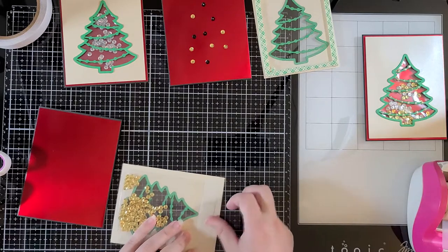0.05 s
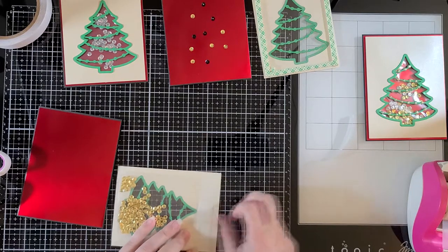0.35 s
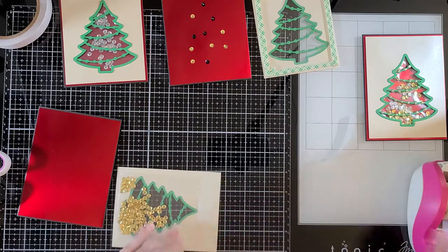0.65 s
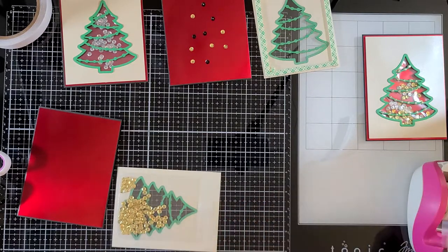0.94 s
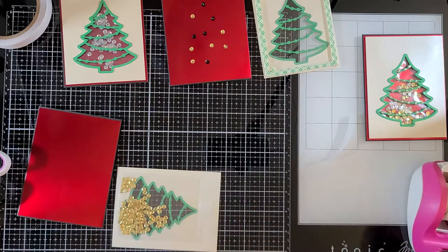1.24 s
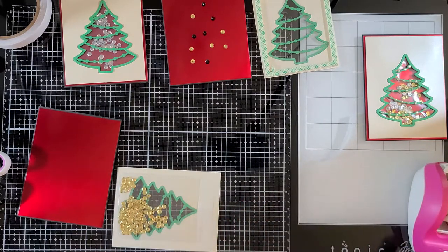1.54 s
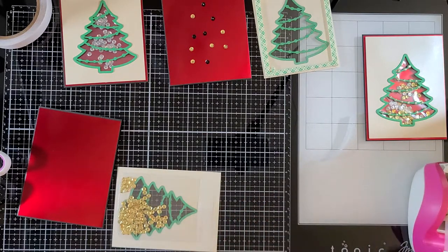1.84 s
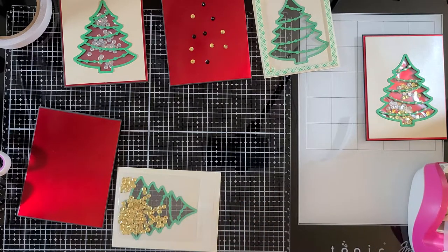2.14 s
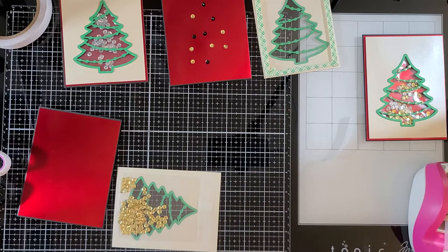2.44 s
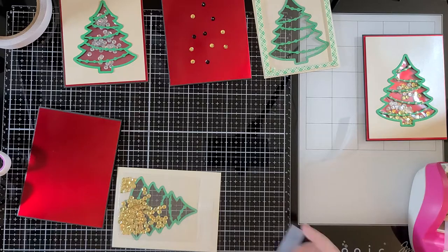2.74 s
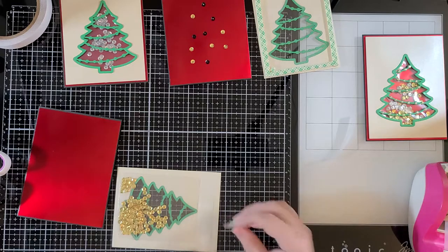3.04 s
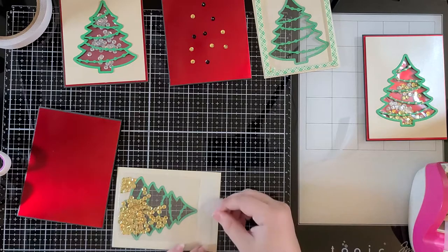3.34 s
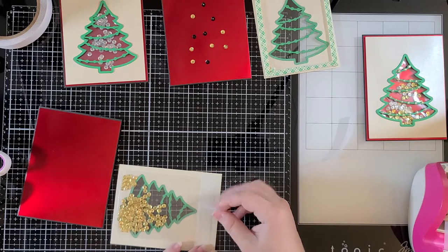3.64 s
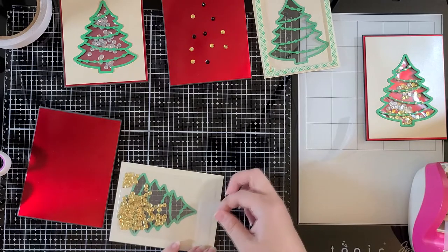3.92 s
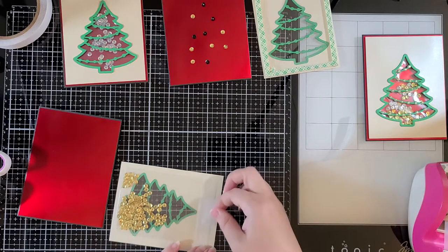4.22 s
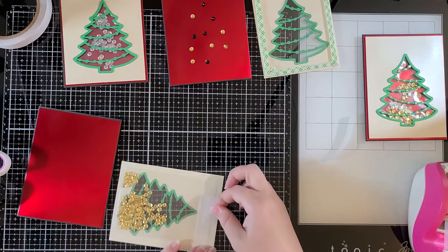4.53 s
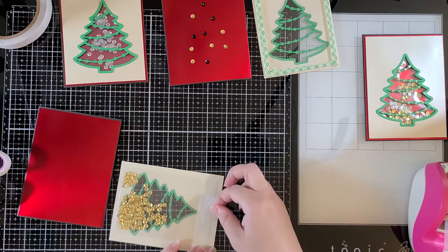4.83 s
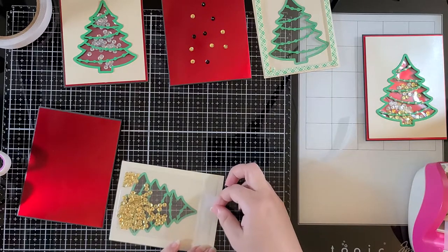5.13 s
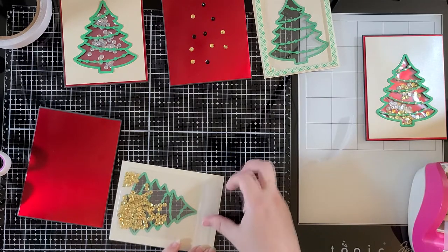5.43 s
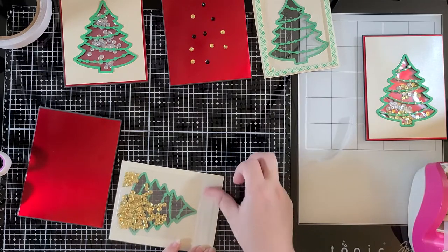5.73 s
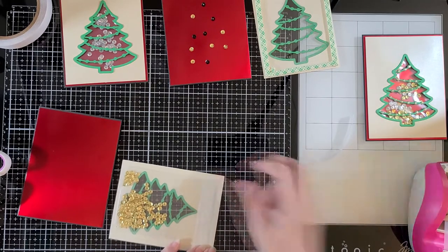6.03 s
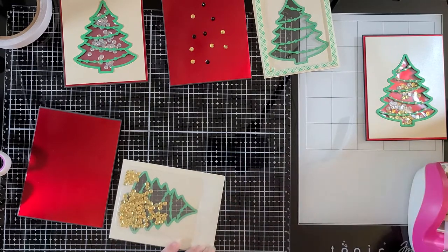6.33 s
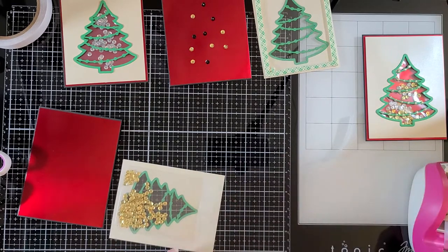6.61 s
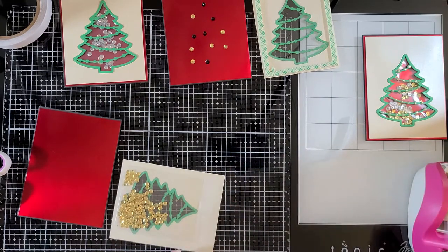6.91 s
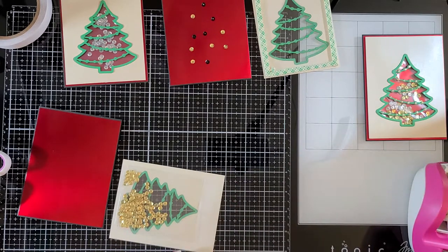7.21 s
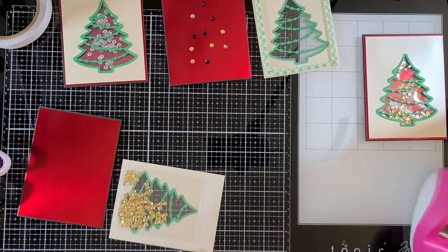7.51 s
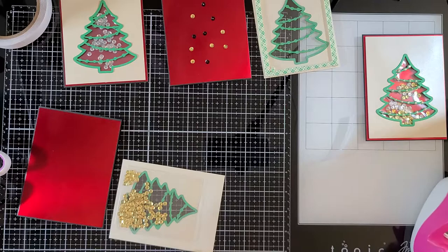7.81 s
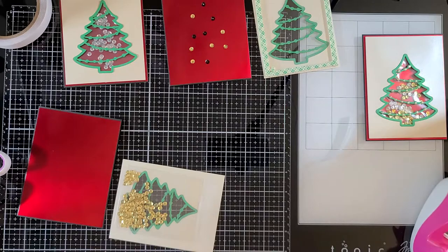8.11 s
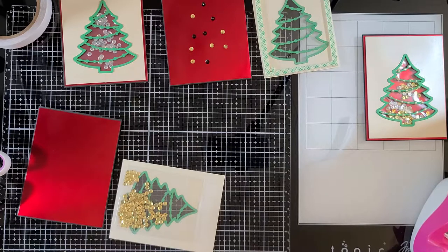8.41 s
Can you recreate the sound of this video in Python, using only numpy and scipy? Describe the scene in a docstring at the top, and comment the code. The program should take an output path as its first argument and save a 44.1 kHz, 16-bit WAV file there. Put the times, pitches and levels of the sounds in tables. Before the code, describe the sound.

A low, steady rumble fills a small, quiet room, and the handling sounds close. Fingers brush a paper card lightly, with a sharp tick and a plastic clack around 1 second. From 1.1 to 2.2 seconds clear tape crackles softly off a desk dispenser, whose hollow body knocks while the desk bumps dully. At 2.3 seconds the tape tears in one short rip with a thump. The strip ticks and crinkles until about 3.7 seconds, followed by a lull. From 5.2 to 6 seconds fingers rub the tape onto the card, with a crisp snap, small slides along the edge and soft pats. A sharp plastic clack and snap come near 6.9 seconds. Light knocks, a paper rub, two soft desk bumps and more clicks follow between 7.3 and 7.9 seconds. Around 8.3 seconds a plastic tool clatters in a quick, bright burst.

```python
"""Fingers brush and pat a paper card over the low rumble of a small, quiet room. Clear tape crackles off
a desk dispenser as its glue lets go, rips across the teeth and is rubbed down onto the card.
Tape and card tick and crinkle as they bend, the hollow dispenser knocks, and the desk booms softly
under each bump on the cutting mat. A plastic tool clatters at the end."""
import sys
import numpy as np
from scipy import signal
from scipy.fft import rfft, irfft, next_fast_len
from scipy.io import wavfile

SR = 44100
rng = np.random.default_rng(int(sys.argv[2]) if len(sys.argv) > 2 else 0)


def generate_wav(sig):
    """Save sig (samples, or channels by samples) to the path in sys.argv[1] as 16-bit PCM at SR."""
    pcm = np.round(np.clip(np.atleast_2d(sig).T, -1, 1) * 32767).astype(np.int16)
    wavfile.write(sys.argv[1], SR, pcm)


N = 373086
TIME = np.arange(N) / SR

# room tone: (frequency [Hz], level [dB])
RUMBLE_SPECTRUM = [(20, -13), (48, -4), (80, -7), (125, 1), (165, -1), (200, -15), (320, -22), (500, -27),
                   (900, -32), (2000, -35), (4000, -43), (7000, -50), (10500, -43), (15500, -53)]
# how alike the room tone is left and right: (frequency [Hz], correlation [-1..1])
RUMBLE_CORRELATION = [(30, .93), (130, .98), (300, .8), (700, .45), (1500, .05), (16000, 0)]
# fingers and tape sliding on paper: (start [s], length [s], treble [dB], presence re treble [dB])
PAPER_RUBS = [(0.15, .1, -62, -19), (0.325, .085, -58, -10), (0.595, .07, -63, 4), (0.845, .05, -68, 7),
              (0.878, .065, -53, 0), (0.93, .12, -63, -3), (1.335, .08, -57, 0), (2.37, .07, -56, -1),
              (2.51, .06, -64, -12), (2.58, .15, -69, -14), (2.835, .04, -65, -2), (3.24, .06, -68, -11),
              (3.37, .11, -66, -12), (3.54, .06, -66, -13), (5.16, .1, -66, -12), (5.22, .12, -61, -17),
              (5.32, .095, -56.5, -1.5), (5.52, .48, -70, -14), (6.63, .048, -56.5, 5), (7.35, .3, -63, -6),
              (7.66, .18, -71, -7), (7.825, .06, -60, -1)]
# scratch of rubbed paper: (frequency [Hz], width [Hz], level [dB])
PAPER_MODES = [(3250, 600, 5), (4350, 800, 9), (5500, 600, 5), (6500, 500, 0)]
# stiff plastic, lower and upper resonances: (frequency [Hz], width [Hz], level [dB])
PLASTIC_LOW_MODES = [(1150, 120, 2), (1480, 110, 5), (1870, 150, 8)]
PLASTIC_HIGH_MODES = [(3200, 350, -2), (3950, 350, 0), (4500, 500, 0)]
# where the hands work: (time [s], left over right [dB], reverb send [dB])
HAND_PATH = [(0.4, 0, -2), (0.9, -4.5, 0), (2.4, -3.5, 0), (2.7, -2, -4), (3.45, 1, -2), (3.7, 1, -1),
             (5.3, -2.5, -5), (6.7, -6.5, -2), (6.95, -3.5, 0), (8.35, -4, 0)]
# fingertips and card landing on the mat: (time [s], level [dB], tilt [dB/octave])
FINGER_TAPS = [(0.157, -51, -6), (0.343, -56, -2), (5.533, -51, -1), (5.816, -37.5, -4), (5.935, -40, -1)]
# the card on the mat: (frequency [Hz], width [Hz], level [dB])
CARD_MODES = [(470, 200, -8), (790, 100, 0), (960, 70, 0), (1080, 80, 0), (1540, 90, -8), (1770, 100, -9),
              (2000, 100, -7), (2410, 120, -15), (2820, 220, -9), (3820, 300, -20)]
# soft bumps on the mat: (time [s], level [dB], contact [s])
MAT_BUMPS = [(1.305, -29.5, .006), (1.4965, -22, .0052), (2.2945, -21.5, .005), (7.579, -25.5, .007),
             (7.630, -28.5, .007)]
# boom of the desk: (frequency [Hz], level [dB], t60 [s])
DESK_MODES = [(58, -18, .3), (104, -8, .13), (119, 1.7, .112), (152, -4, .1), (186, -2.5, .075),
              (240, -8, .055), (295, -11, .05), (350, -12, .04), (440, -12, .04)]
# thumb along the card's edge: (start [s], end [s], level [dB], tilt [dB/octave], pitch [ratio])
THUMB_SLIDES = [(0.21, 0.28, -64, -5, 1), (5.52, 5.575, -57, 1, 1), (5.56, 5.65, -64, -1, 1),
                (5.635, 5.715, -57.5, -1, 1.02), (5.69, 5.77, -62, 3, 1.22), (5.83, 5.875, -62, 3, 1.15),
                (5.945, 5.98, -62, 2, 1.3)]
# the card's edge under the thumb: (frequency [Hz], width [Hz], level [dB])
EDGE_MODES = [(840, 60, 3), (1540, 70, -1), (1990, 70, -2), (2260, 90, -12), (2950, 120, -13),
              (3310, 140, -14), (3810, 160, -16)]
# tape and card snapping as they bend: (time [s], treble [dB], mids re treble [dB],
# presence re treble [dB], decay [ms], pitch [Hz], ring [Hz], ring re treble [dB])
BEND_SNAPS = [(0.6105, -52, -8, 3, 1.5, 3270, 3030, -8), (0.9172, -46, -12, -3, 1, 4310, 3130, -14),
              (0.9648, -32.5, -7, -5, .7, 15000, 1500, -19), (0.9778, -45, -12, -8, 1.5, 15000, 3200, -16),
              (1.3458, -42, -19, -13, 1.5, 10000, 3500, -20), (1.361, -47, -12, -4, 1, 5550, 3140, -16),
              (1.3685, -46, -15, -6, 2.0, 5600, 1750, -14), (1.7706, -45, -20, -4, 1.2, 5700, 1500, -22),
              (1.978, -45, -14, -7, 1.3, 9500, 2940, -14), (1.9955, -47, -14, -11, 1.4, 10000, 1780, -9),
              (2.2665, -42, -16, -13, 2.0, 11000, 1800, -22),
              (2.7274, -33, -6.5, -5.5, 1.3, 12500, 1250, -17),
              (2.9052, -53, -10, -9, 1.8, 11000, 1730, -11), (2.9805, -53, -14, -11, 1.2, 11000, 1100, -13),
              (3.0265, -39.5, -4, -8, 2.7, 9000, 1200, -7), (3.114, -46, -23, -18, 3.3, 11000, 1060, -21),
              (3.3718, -40, -4, -7, 1.5, 11000, 2000, -4), (3.4519, -35, -6, -6, 2.2, 10600, 2050, -10),
              (3.7023, -38.5, -5, -4, 3.2, 9600, 1450, -5), (3.7097, -35, -12, -10, 2.9, 11800, 880, -14),
              (5.3263, -37, -17, -11, 3.5, 15000, 3020, -26),
              (5.4081, -27.5, -4, -7.5, 1.7, 8000, 1900, -15), (5.4165, -38, -3, -12, 3, 10500, 680, -6),
              (6.5473, -44, -17, -6, .9, 8500, 1850, -15), (6.8043, -31, -25, -11, .5, 15300, 1800, -24),
              (6.9271, -24, -9, -5, 3.0, 11900, 900, -15), (7.4976, -44, -2, -3, 1.1, 5500, 1200, -5),
              (7.8768, -40, -18, -6, .6, 4220, 1130, -20), (7.89, -31, -17, -9, .7, 15200, 1130, -20),
              (7.9058, -29, -11, -10, 2.3, 11900, 1800, -14), (8.2929, -24, -15, -18, .8, 15300, 1500, -28),
              (8.3217, -36, -22, -22, .8, 9000, 2900, -30), (8.3283, -24, -20, -22, .6, 14200, 2900, -30),
              (8.3355, -20, -16, -17, .6, 15000, 1700, -26), (8.3449, -26, -15, -14, 1.3, 10400, 2920, -22),
              (8.366, -33, -12, -13, 1.5, 7700, 3100, -18), (8.3755, -21, -24, -22, 1.5, 7600, 3100, -32),
              (8.3843, -24.5, -19, -20, 1.1, 8500, 3100, -28),
              (8.3993, -25, -18, -15, 1.5, 8700, 3100, -28)]
# hard plastic clacking down: (time [s], treble [dB], mids re treble [dB], presence re treble [dB],
# pitch [Hz], ring [Hz], ring re treble [dB])
PLASTIC_CLACKS = [(1.0463, -27, -5, -3.5, 3950, 1950, -5), (6.8897, -24, -8, -7, 4480, 1950, -8),
                  (8.3375, -16.5, -16, -14, 15000, 1700, -21)]
# tape leaving the reel: (time [s], level [dB], pitch of the taut strip [ratio])
TAPE_PULL = [(1.12, -69, 1), (1.2, -69, 1), (1.27, -61, .97), (1.38, -58, 1), (1.53, -69, 1.03),
             (1.69, -63, 1.13), (1.74, -81, 1.1), (1.98, -80, 1), (2.1, -62, .9), (2.18, -80, .9)]
# the stretched strip of tape: (frequency [Hz], width [Hz], level [dB])
STRIP_MODES = [(1800, 200, -4), (3500, 200, 0), (3950, 250, -1), (5530, 250, 2), (6150, 250, -2),
               (9310, 400, 2), (11700, 600, 4)]
# light knocks of the dispenser: (time [s], level [dB], frequency struck hardest [Hz])
DISPENSER_KNOCKS = [(1.2149, -30, 1550), (1.2743, -22.5, 2600), (1.475, -42, 3900), (1.865, -46, 2400),
                    (1.9955, -37, 1780), (2.2432, -38, 1800), (2.8154, -33, 1600), (3.465, -35, 1900),
                    (6.2753, -49, 3400), (6.7593, -31, 4700), (7.505, -39, 1500), (7.569, -38, 4900),
                    (7.8415, -34, 4700), (7.8529, -30, 1900)]
# the dispenser's hollow body: (frequency [Hz], width [Hz], level [dB])
DISPENSER_MODES = [(1500, 150, -6), (1800, 140, 1), (3360, 220, -3), (3890, 150, -2), (4660, 300, -1)]
# tape torn across the teeth: (start [s], end [s], density [snaps/s], level [dB])
TAPE_TEAR = (2.2705, 2.2975, 7000, -29.7)
# tone of the tear: (frequency [Hz], level [dB])
TEAR_SPECTRUM = [(400, -24), (750, -8), (1650, -3), (2150, -12), (2900, -1), (3800, -8), (4900, -2),
                 (7000, -5), (9000, -2), (11300, 3), (15500, 0), (16800, -14)]
# a finger squeaking on plastic: (start [s], end [s], start pitch [Hz], end pitch [Hz], level [dB])
FINGER_SQUEAKS = [(6.28, 6.56, 2170, 1870, -78.5), (8.08, 8.29, 1900, 1620, -82.5)]
# tone of the reverb: (frequency [Hz], level [dB])
REVERB_SPECTRUM = [(150, -12), (500, -2), (1500, 3), (4000, 0), (8000, 0), (16000, -3)]
# length of the reverb: (frequency [Hz], t60 [s])
REVERB_DECAY = [(150, .3), (1200, .35), (4000, .25), (9000, .22), (16000, .19)]


def from_db(db):
    """Decibels to gain."""
    return 10 ** (np.asarray(db) / 20)


def rms_one(x):
    """Scale to rms 1."""
    return x / np.sqrt(np.mean(x ** 2) + 1e-20)


def at_hz(points, hz):
    """Read a table on a log-frequency axis."""
    f, value = np.transpose(points)
    return np.interp(np.log(np.maximum(hz, 1)), np.log(f), value)


def band(x, low_hz, high_hz):
    """Band-pass filter."""
    sos = signal.butter(2, [low_hz, min(high_hz, .47 * SR)], "band", fs=SR, output="sos")
    return signal.sosfilt(sos, x + 1e-18)


def colour(x, spectrum):
    """EQ a noise to a spectrum, at rms 1."""
    size = next_fast_len(x.shape[-1])
    gain = from_db(at_hz(spectrum, np.fft.rfftfreq(size, 1 / SR)))
    return rms_one(irfft(rfft(x, size) * gain, size)[..., :x.shape[-1]])


def resonate(x, modes):
    """A bank of parallel resonators."""
    return sum(from_db(db) * signal.lfilter(*signal.iirpeak(hz, hz / width, SR), x + 1e-18)
               for hz, width, db in modes)


def pan(left_db):
    """Left and right gains at constant power."""
    return rms_one(from_db([[left_db / 2], [-left_db / 2]]))


def hand_left_db(s):
    """Left-right balance of the hands at time s."""
    return np.interp(s, *np.transpose(HAND_PATH)[:2])


def add(out, s, sound):
    """Mix a short sound in at time s."""
    i = int(round(s * SR))
    out[..., i:i + sound.shape[-1]] += sound[..., :max(N - i, 0)]


def add_layers(layers, s, sound, mids_db, presence_db, left_db):
    """Feed a sound to the mids, presence and treble layers, the lower ones nearer the centre."""
    mids, presence, treble = layers
    add(mids, s, sound * pan(left_db * .2) * from_db(mids_db))
    add(presence, s, sound * pan(left_db * .8) * from_db(presence_db))
    add(treble, s, sound * pan(left_db))


def rumble(level_db=-61.7, hum_hz=58, hum_db=-71):
    """Steady low room tone, nearly mono in the bass, with a faint hum."""
    mid, side = rfft(rng.standard_normal((2, N)))
    alike = at_hz(RUMBLE_CORRELATION, np.fft.rfftfreq(N, 1 / SR))
    air = irfft(np.sqrt(1 + alike) * mid + np.sqrt(1 - alike) * side * [[1], [-1]], N)
    hum = from_db(hum_db) * np.sin(2 * np.pi * hum_hz * TIME)
    return from_db(level_db) * colour(air, RUMBLE_SPECTRUM) + hum


def grains(per_s, spread_db):
    """Random tiny snaps of uneven size, with a different strength in each ear."""
    sizes = from_db(spread_db * np.minimum(rng.exponential(1, N), 4))
    return rms_one((rng.random(N) < per_s / SR) * sizes * rng.standard_normal((2, N)))


def crackle(per_s, spread_db, width_hz, pitch_count=24):
    """Tiny snaps, each ringing briefly at a random pitch."""
    snaps = grains(per_s, spread_db)
    choice = rng.integers(0, pitch_count, N)
    pitches = np.linspace(900, 16000, pitch_count)
    return rms_one(sum(resonate(snaps * (choice == k), [(hz, width_hz, 0)])
                       for k, hz in enumerate(pitches)))


def grip(catch_db, catch_s):
    """Friction catches and lets go: a randomly wavering gain."""
    knots = np.arange(0, TIME[-1], catch_s)
    return from_db(catch_db * np.interp(TIME, knots, rng.standard_normal(len(knots))))


def strokes(rustle_s=.052, rustle_lead_s=.032, rattle_s=.06, rattle_db=-25.5):
    """Rubs, the rustle round each snap and the rattle after each clack, as cues for rubbing()."""
    for s, length_s, db, presence_db in PAPER_RUBS:
        mids_db = -11 + .25 * presence_db
        yield s, length_s, db, mids_db, presence_db
    for s, db, mids_db, presence_db, decay_ms, *_ in BEND_SNAPS:
        rustle_db = -63.5 + .3 * db + 3.8 * decay_ms    # strong, slow snaps rustle more
        yield s - rustle_lead_s, rustle_s, rustle_db, mids_db, presence_db
    for s, db, mids_db, presence_db, *_ in PLASTIC_CLACKS:
        yield s, rattle_s, db + rattle_db, mids_db + 1, presence_db


def rubbing(hiss_gain=.5, body_db=6, air_db=2.5):
    """Each stroke swells and fades: fine friction hiss with crinkles in it, catching and letting go."""
    layers = np.zeros((3, 2, N))
    for s, length_s, db, mids_db, presence_db in strokes():
        swell = from_db(db) * np.hanning(int(length_s * SR)) ** .55
        add_layers(layers, s, swell, mids_db, presence_db, left_db=.45 * hand_left_db(s))
    crinkles = crackle(per_s=7000, spread_db=2.5, width_hz=450)
    hold = grip(catch_db=2.4, catch_s=.009)
    friction = rms_one(hold * (crinkles + hiss_gain * rng.standard_normal((2, N))))
    mids, presence, treble = layers * friction
    body = from_db(body_db) * band(mids, 420, 2100) + resonate(mids, PLASTIC_LOW_MODES)
    scratch = band(resonate(presence, PAPER_MODES), 2900, 8000)
    air = from_db(air_db) * band(band(treble, 6300, 18000), 7800, 16000)
    return body + scratch + air


def card_friction(force, modes, tilt_db, pitch=1):
    """Skin friction rings the card's modes, made brighter or duller by tilt_db per octave."""
    tilted = [(hz * pitch, width, db + tilt_db * np.log2(hz / 1000)) for hz, width, db in modes]
    friction = band(force * rng.standard_normal((2, len(force))), 300, 4200)
    return band(resonate(friction, tilted), 200, 4200)


def taps(pat_db=13.5, scuff_db=-24, rise_s=.0016, decay_s=.012):
    """Dull fingertip pats coloured by the card, with a faint scuff of skin on top."""
    out, t = np.zeros((2, N)), TIME[:SR // 6]
    for s, db, tilt_db in FINGER_TAPS:
        force = from_db(db) * (1 - np.exp(-t / rise_s)) * np.exp(-t / decay_s)
        scuff = band(force * rng.standard_normal((2, len(t))), 7500, 16000)
        pat = card_friction(force, CARD_MODES, tilt_db)
        add(out, s - rise_s, from_db(pat_db) * pat + from_db(scuff_db) * scuff)
    return out


def desk_mode(push, hz, t60):
    """One mode of the desk: a unit click starts a decaying sine of height 1."""
    radius, angle = from_db(-60 / (t60 * SR)), 2 * np.pi * hz / SR
    return signal.lfilter([0, np.sin(angle)], [1, -2 * radius * np.cos(angle), radius ** 2], push + 1e-18)


def desk_boom(gain_db=.5, low_cut_hz=95, clack_db=-19, clack_s=.001, tap_db=-8, tap_s=.0025):
    """Bumps, clacks and taps rock the desk's low modes; a longer contact is duller."""
    jolts = [(s, db + clack_db, clack_s) for s, db, *_ in PLASTIC_CLACKS]
    nudges = [(s, db + tap_db, tap_s) for s, db, _ in FINGER_TAPS]
    push = np.zeros(N)
    for s, db, contact_s in MAT_BUMPS + jolts + nudges:
        pulse = np.hanning(int(contact_s * SR))
        add(push, s, from_db(db) * pulse / pulse.sum())
    boom = sum(from_db(db) * desk_mode(push, hz, t60) for hz, db, t60 in DESK_MODES)
    # the desk radiates little deep bass
    return from_db(gain_db) * band(band(boom, low_cut_hz, 900), low_cut_hz, 900)


def slides(gain_db=13):
    """The thumb catches and slips along the card's edge, whose notes shift from slide to slide."""
    out, hold = np.zeros((2, N)), grip(catch_db=3, catch_s=.008)
    for start, end, db, tilt_db, pitch in THUMB_SLIDES:
        size = int((end - start) * SR)
        force = from_db(db + gain_db) * signal.windows.tukey(size) * hold[int(start * SR):][:size]
        add(out, start, card_friction(force, EDGE_MODES, tilt_db, pitch))
    return out


def crack(decay_ms, flutter_db=-26, flutter_s=.009, correlation=.45, left_delay_s=.0002):
    """A sharp snap with the sheet's brief flutter behind it, reaching the right ear first."""
    t = TIME[:SR // 16]
    noise = rng.standard_normal((3, len(t)))
    noise = np.sign(noise) * np.abs(noise) ** .5    # squash the peaks
    envelope = np.exp(-t * 1000 / decay_ms) + from_db(flutter_db) * np.exp(-t / flutter_s)
    snap = (np.sqrt(correlation) * noise[2] + np.sqrt(1 - correlation) * noise[:2]) * envelope
    snap[0] = np.interp(t - left_delay_s, t, snap[0], left=0)
    return snap / np.sqrt(np.sum(envelope ** 2) / SR * 500)    # same energy for any decay


def flex(snap, hz, peak_db=5, q=11):
    """Each bend stresses one well-damped pitch; the snap keeps its level."""
    pitched = snap + resonate(snap, [(hz, hz / q, peak_db)])
    return rms_one(pitched) * np.sqrt(np.mean(snap ** 2))


def sheet(mids, presence, treble, mids_db=5.5, presence_db=2.5, air_db=3.6):
    """Three layers of a snapping sheet; the stiff plastic's resonances colour the lower two."""
    body = from_db(mids_db) * band(mids, 400, 2700) + resonate(mids, PLASTIC_LOW_MODES)
    bite = from_db(presence_db) * band(presence, 2900, 6000) + resonate(presence, PLASTIC_HIGH_MODES)
    return body - bite + from_db(air_db) * band(treble, 7400, 15300)


def clicks(gain_db=.7, swell_db=-14, swell_s=.0026, clack_decay_ms=1.2):
    """The attack of each snap and clack: a brief swell of noise, then a crack."""
    clacks = [(s, db, mids_db, presence_db, clack_decay_ms, hz)
              for s, db, mids_db, presence_db, hz, *_ in PLASTIC_CLACKS]
    layers, lead = np.zeros((3, 2, N)), TIME[:SR // 40]
    for s, db, mids_db, presence_db, decay_ms, hz, *_ in BEND_SNAPS + clacks:
        swell = from_db(swell_db) * np.exp(-lead[::-1] / swell_s) * rng.standard_normal((2, len(lead)))
        click = from_db(db + gain_db) * flex(np.hstack([swell, crack(decay_ms)]), hz)
        add_layers(layers, s - len(lead) / SR, click, mids_db, presence_db, hand_left_db(s))
    return sheet(*layers)


def plastic_rings(t60_s=.03, clack_db=-6, clack_t60_s=.02):
    """Each snap or clack leaves the plastic ringing briefly; a clack adds a second note at its pitch."""
    notes = [(s, db + ring_db, hz, t60_s) for s, db, *_, hz, ring_db in BEND_SNAPS + PLASTIC_CLACKS]
    notes += [(s, db + presence_db + clack_db, hz, clack_t60_s)
              for s, db, _, presence_db, hz, *_ in PLASTIC_CLACKS]
    out, t = np.zeros((2, N)), TIME[:SR // 10]
    for s, db, hz, t60 in notes:
        tone = np.sin(2 * np.pi * hz * t + rng.uniform(0, 2 * np.pi, (2, 1)))
        add(out, s, from_db(db - 60 * t / t60) * tone * pan(.4 * hand_left_db(s)))
    return out


def unrolling(hiss_db=1, rasp_db=-8.5, crinkle_db=3, fade_s=.03, left_db=-2):
    """Glue lets go of the reel in uneven crackles that ring the strip, whose pitch follows the tension."""
    s, db, pitch = np.transpose(TAPE_PULL)
    gate = np.clip((TIME - s[0]) / fade_s, 0, 1) * np.clip((s[-1] - TIME) / fade_s, 0, 1)
    strip = resonate(grains(per_s=350, spread_db=3.4), STRIP_MODES)
    warped_time = np.cumsum(np.interp(TIME, s, pitch)) / SR    # varispeed bends the resonances
    crinkles = np.array([np.interp(warped_time, TIME, side) for side in strip])
    glue = crackle(per_s=6000, spread_db=2.6, width_hz=330)
    hiss = band(glue, 8600, 16000) + from_db(rasp_db) * band(glue, 900, 6000)
    level = gate * from_db(np.interp(TIME, s, db)) * grip(catch_db=1.8, catch_s=.014)
    return level * (from_db(crinkle_db) * crinkles + from_db(hiss_db) * hiss) * pan(left_db)


def knocks(gain_db=2, decay_s=.0025, tick_db=-27, db_per_octave=9, left_db=-2):
    """The reel shifts in its seat and rings the hollow dispenser, most near the frequency struck."""
    out, t = np.zeros((2, N)), TIME[:SR // 20]
    for s, db, struck_hz in DISPENSER_KNOCKS:
        hit = from_db(db + gain_db) * np.exp(-t / decay_s) * rng.standard_normal((2, len(t)))
        modes = [(hz, width, mode_db - db_per_octave * abs(np.log2(hz / struck_hz)))
                 for hz, width, mode_db in DISPENSER_MODES]
        body = band(resonate(hit, modes), 1100, 6000)
        add(out, s, body + from_db(tick_db) * band(hit, 5500, 15000))
    return out * pan(left_db)


def tear(fade_s=.002, left_db=-5):
    """The tape parts tooth by tooth in one quick run of snaps."""
    start, end, per_s, db = TAPE_TEAR
    gate = np.clip((TIME - start) / fade_s, 0, 1) * np.clip((end - TIME) / fade_s, 0, 1)
    rip = colour(grains(per_s, spread_db=1.2), TEAR_SPECTRUM)
    return from_db(db) * gate * rip * pan(left_db)


def squeaks(roughness_hz=120, fade_s=.02):
    """A thin, rough tone that sinks as a finger slides on plastic."""
    out = np.zeros((2, N))
    lowpass = signal.butter(2, roughness_hz, fs=SR, output="sos")
    for start, end, start_hz, end_hz, db in FINGER_SQUEAKS:
        t = TIME[:int((end - start) * SR)]
        phase = 2 * np.pi * np.cumsum(np.linspace(start_hz, end_hz, len(t))) / SR
        wobble = signal.sosfilt(lowpass, rng.standard_normal((2, 2, len(t))))
        tone = rms_one(wobble[0] * np.cos(phase) + wobble[1] * np.sin(phase))
        fade = np.clip(np.minimum(t, t[::-1]) / fade_s, 0, 1)
        add(out, start, from_db(db) * fade * tone)
    return out


def room(x, wet_db=-8.7, early_db=5, early_s=.015, onset_s=.004):
    """Strong early reflections off the desk and near walls, then a short tail whose treble dies first."""
    t, edges_hz = TIME[:SR // 2], np.geomspace(120, 19000, 9)
    tail = 0
    for low, high in zip(edges_hz, edges_hz[1:]):
        hz = np.sqrt(low * high)
        decay = from_db(at_hz(REVERB_SPECTRUM, hz) - 60 * t / at_hz(REVERB_DECAY, hz))
        tail = tail + band(rng.standard_normal((2, len(t))), low, high) * decay
    onset = np.clip(t / onset_s - .5, 0, 1)
    early_lift = 1 + from_db(early_db) * np.exp(-t / early_s)
    response = rms_one(tail * onset * early_lift) / np.sqrt(len(t))
    return from_db(wet_db) * signal.fftconvolve(x, response, axes=1)[:, :N]


def scene(crossfeed=.4):
    """All the handling shares one room; tape held close over the card sounds drier."""
    in_hand = clicks() + plastic_rings() + rubbing()
    on_desk = knocks() + unrolling() + tear() + squeaks() + taps() + slides() + desk_boom()
    s, _, send_db = np.transpose(HAND_PATH)
    send = on_desk + from_db(np.interp(TIME, s, send_db)) * in_hand
    reverb = room(send + crossfeed * send[::-1])    # the walls mix left and right
    return in_hand + on_desk + reverb + rumble()


def record(dry):
    """A steep high cut, 60 dB down at 17.1 kHz."""
    return signal.sosfilt(signal.cheby2(16, 60, 17100, fs=SR, output="sos"), dry)


dry = scene()
out = record(dry)
generate_wav(out)
```